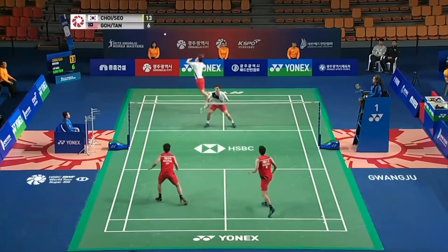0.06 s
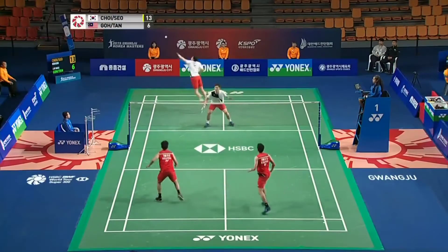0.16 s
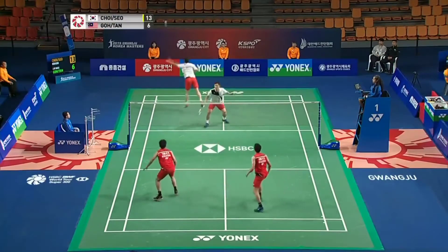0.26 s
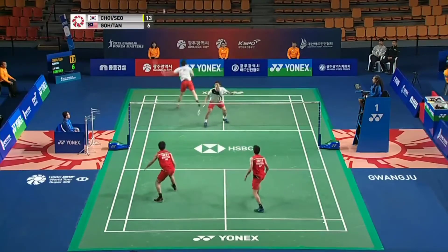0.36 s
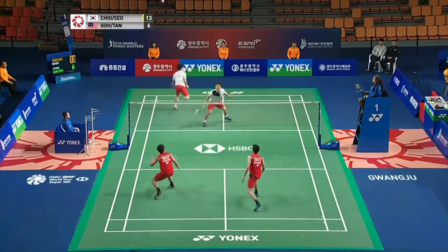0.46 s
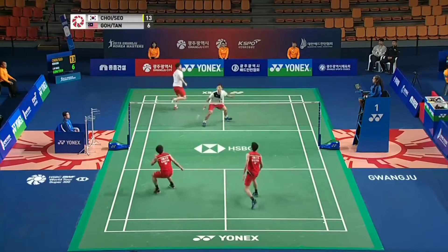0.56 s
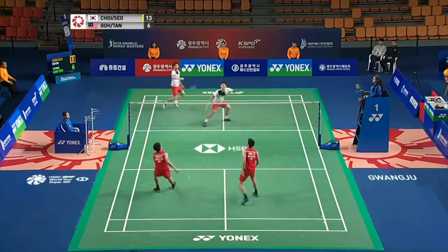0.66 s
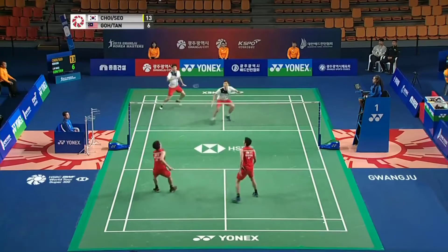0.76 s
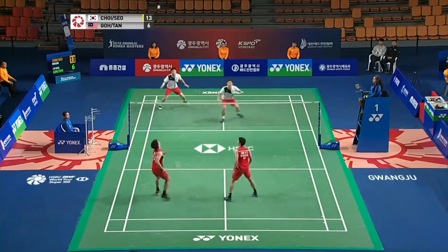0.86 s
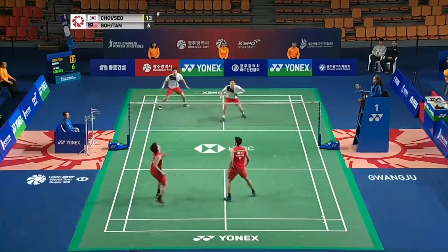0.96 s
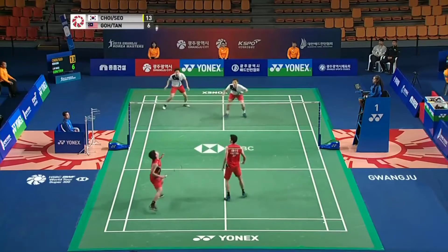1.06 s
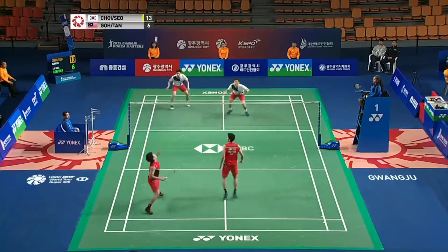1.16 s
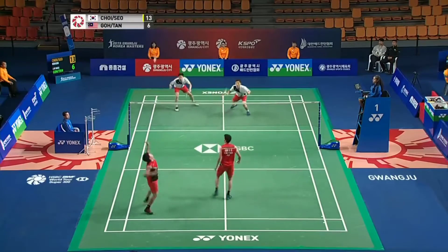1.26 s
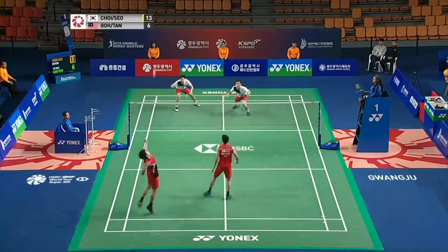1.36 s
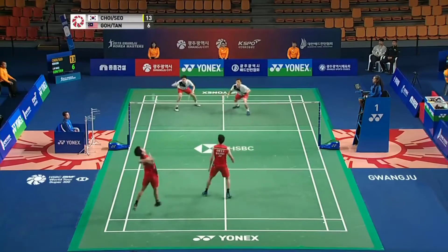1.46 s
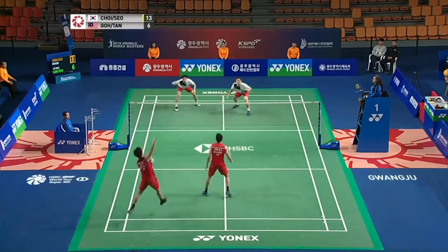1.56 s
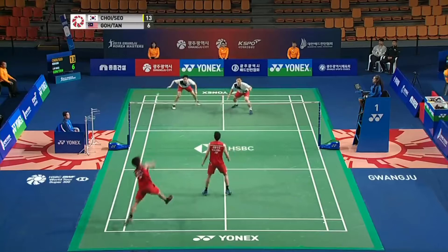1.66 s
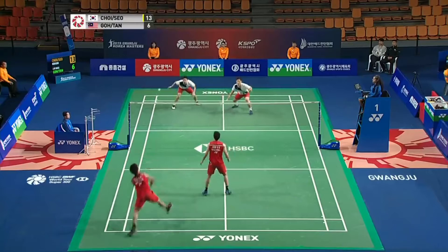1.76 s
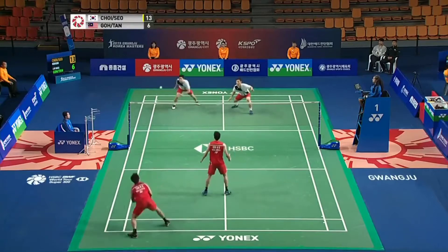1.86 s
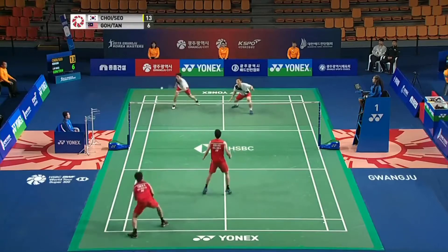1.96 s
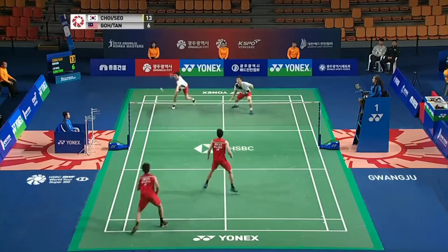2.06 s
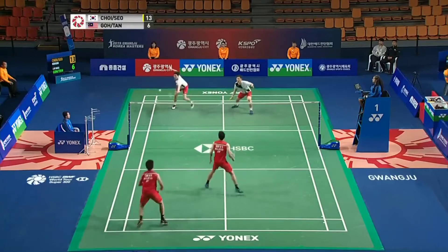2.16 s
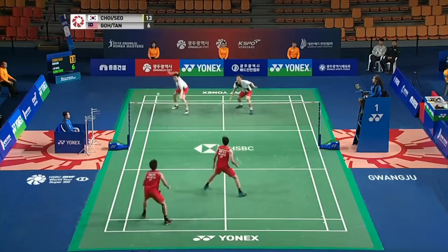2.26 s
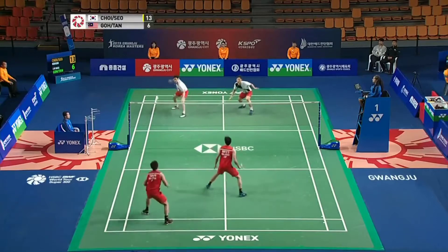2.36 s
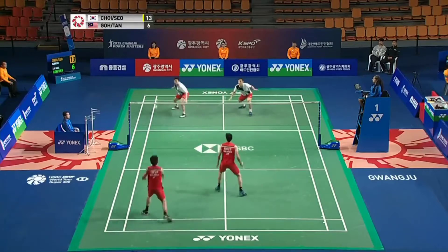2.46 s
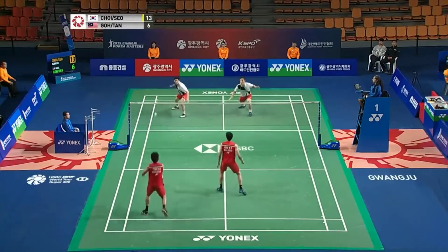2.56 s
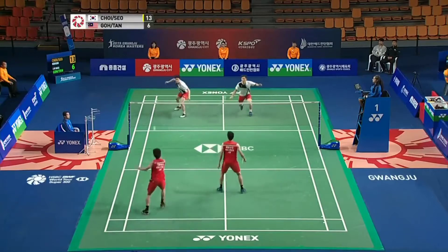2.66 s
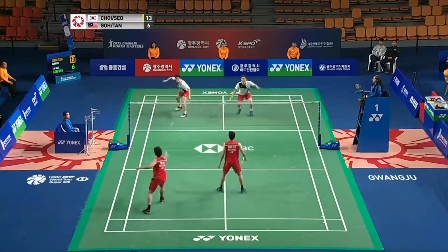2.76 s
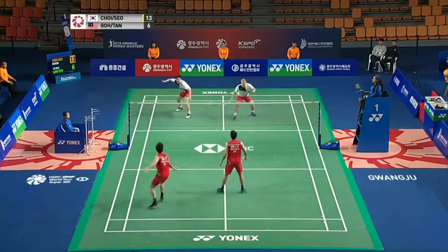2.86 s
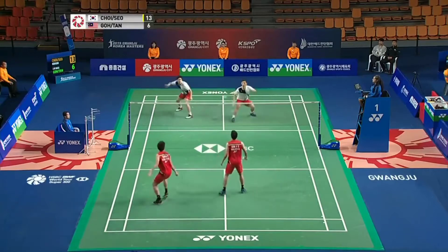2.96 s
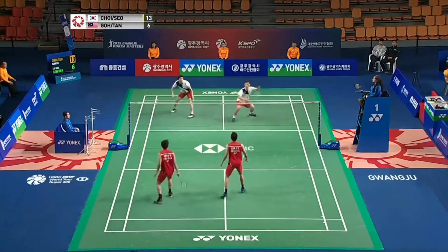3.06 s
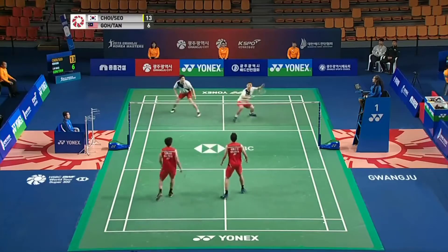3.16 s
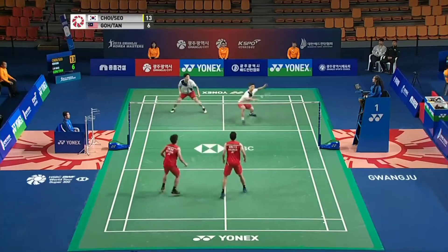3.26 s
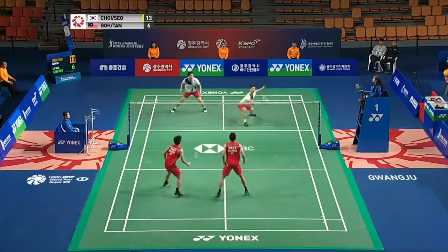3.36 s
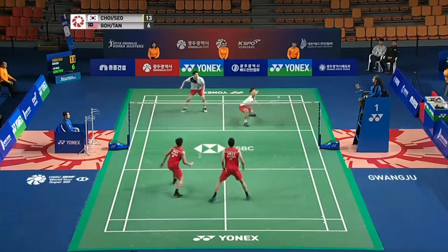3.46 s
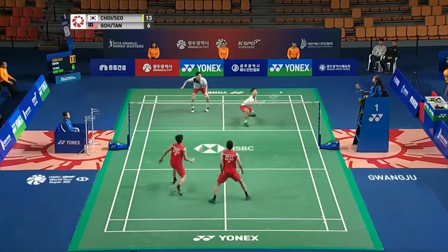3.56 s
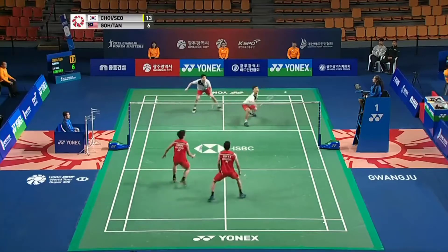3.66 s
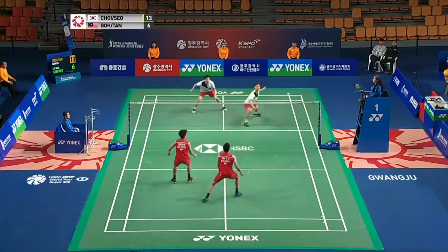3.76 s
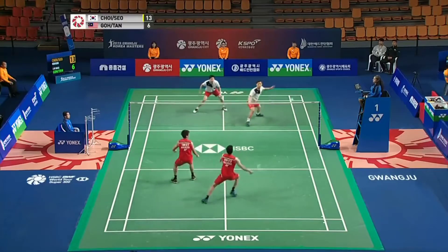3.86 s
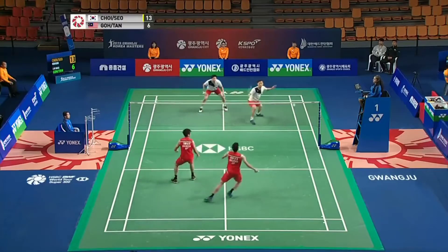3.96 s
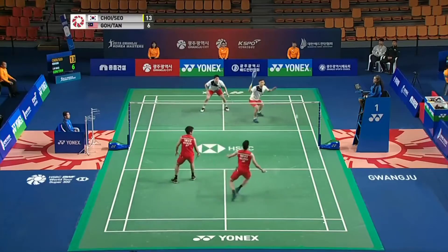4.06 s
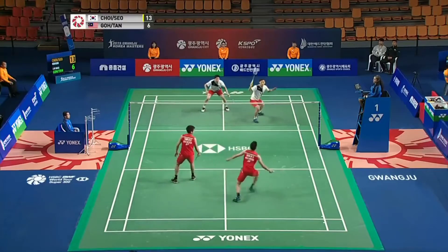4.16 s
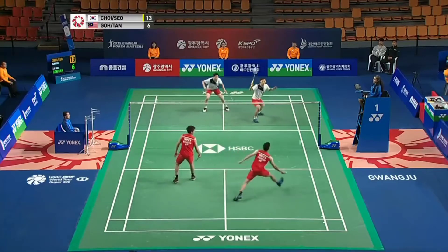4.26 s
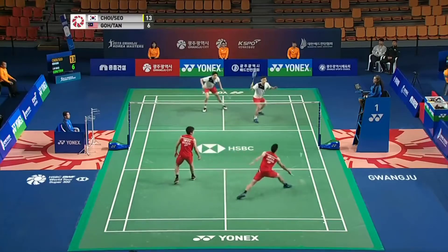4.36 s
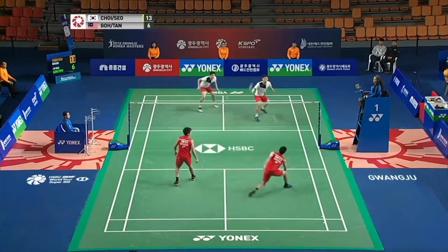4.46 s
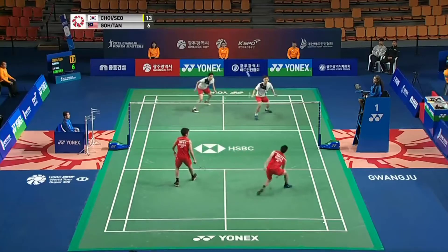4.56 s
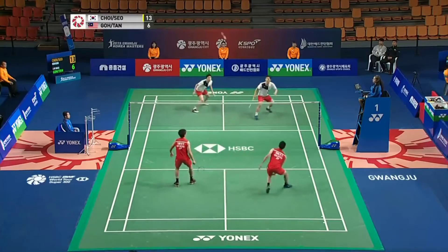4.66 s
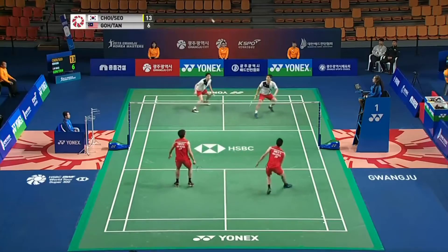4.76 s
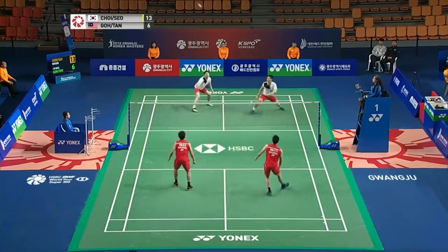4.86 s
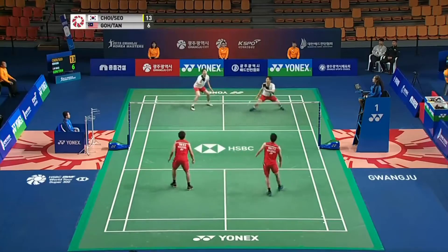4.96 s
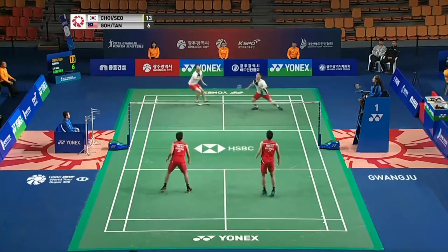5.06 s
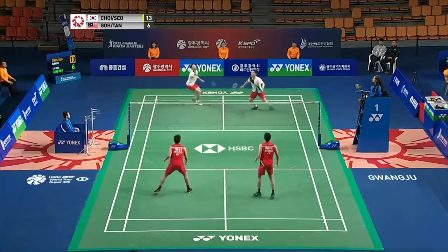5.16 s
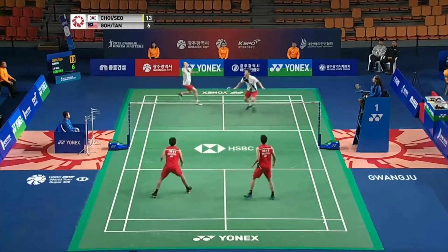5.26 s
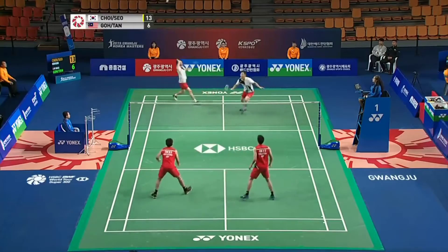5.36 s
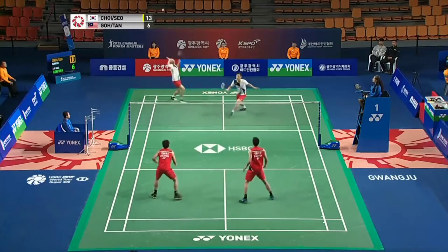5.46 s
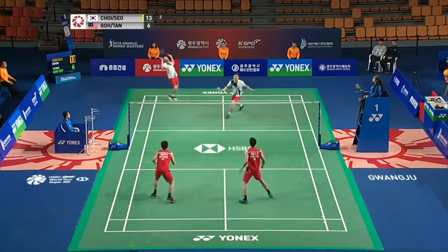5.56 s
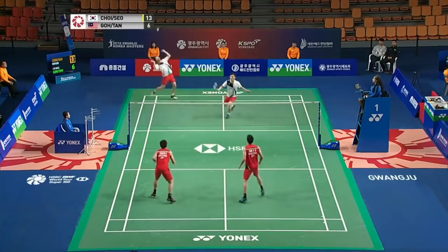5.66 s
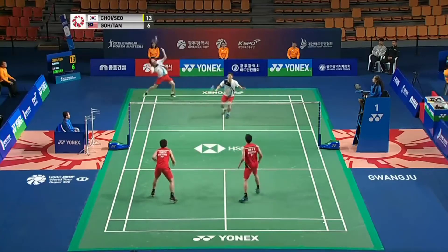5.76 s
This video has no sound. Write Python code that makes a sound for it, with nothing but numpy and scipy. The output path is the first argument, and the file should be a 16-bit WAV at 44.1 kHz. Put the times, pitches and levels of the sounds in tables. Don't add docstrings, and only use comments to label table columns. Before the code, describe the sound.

Rackets smack a shuttlecock at uneven intervals while rubber soles tap, scuff and chirp on a sprung court in a reverberant arena.

```python
import sys
import numpy as np
from scipy import signal
from scipy.fft import rfft, irfft, next_fast_len
from scipy.io import wavfile
from scipy.ndimage import uniform_filter1d

SR = 44100
rng = np.random.default_rng(int(sys.argv[2]) if len(sys.argv) > 2 else 0)


def amplitude_ratio(level_db):
    exponent = np.asarray(level_db, float) / 20
    return 10 ** exponent


def file_out(sig):
    cols = np.atleast_2d(sig).T
    lim = np.clip(cols, -1, 1)
    pcm = np.round(lim * 32767).astype(np.int16)
    wavfile.write(sys.argv[1], SR, pcm)


N = 255817
T = np.arange(N) / SR


def noise(n=N):
    return rng.standard_normal(n)


def colour(x, points):
    hz, db = np.transpose(points)
    size = next_fast_len(len(x))
    log_f = np.log(np.arange(size // 2 + 1) * SR / size + 1)
    gain = amplitude_ratio(np.interp(log_f, np.log(hz), db))
    return irfft(rfft(x, size) * gain, size)[:len(x)]


def band(x, lo_hz, hi_hz):
    sos = signal.butter(2, [lo_hz, min(hi_hz, 0.45 * SR)], "band", fs=SR, output="sos")
    return signal.sosfilt(sos, x)


def unit(x):
    return x / np.sqrt(np.mean(x ** 2))


def add(out, start_s, x):
    i = int(start_s * SR)
    out[i:i + len(x)] += x[:N - i]


def decay(t, t60_s):
    return np.exp(-np.log(1000) * t / t60_s)


def burst(fall_s, lo_hz, hi_hz):
    t = T[:1500]
    push = 0.5 * noise(len(t)) * np.exp(-t / fall_s)
    push[0] = np.sqrt(fall_s * SR) / 2
    x = band(band(push, lo_hz, hi_hz), lo_hz / 4, 1.82 * hi_hz)
    return x / np.abs(x).max()


def flicker(rate_hz):
    hold = int(SR / rate_hz)
    levels = np.repeat(noise(N // hold + 1), hold)
    return unit(uniform_filter1d(levels, hold)[:N])


def swells(table, rise_s, rest_db):
    power = np.full(N, amplitude_ratio(rest_db) ** 2)
    for s, db, t60_s in table:
        swell = amplitude_ratio(db) * (1 - np.exp(-T / rise_s)) * decay(T, t60_s)
        add(power, s, swell ** 2)
    return np.sqrt(power)


# t/s, crack level/dB, bright edge level/dB, crack f/Hz, hall send level/dB
NEAR_BLOWS = [(0.273, -23, -4.5, 2150, 2), (0.2826, -28, -18, 1300, 0), (0.2947, -28, -4, 1340, -3),
              (1.6388, -3.5, -31, 1690, 5), (1.6422, -9.5, -12, 1260, 1.5), (1.6528, -15, -28, 1150, -8),
              (1.6622, -5.5, -21, 1260, -21), (1.6657, -6.5, -13.5, 1340, -16), (2.1058, -27, -6, 760, 1),
              (2.1254, -23, -7.5, 1260, 4.5), (2.7861, -30, -9, 2110, 2), (2.811, -22.5, -12, 1320, 8),
              (4.4957, -21.5, -18, 2170, -2), (4.5017, -18, -13, 1980, -4),
              (4.5161, -12.5, -5.5, 1390, 5.5), (4.542, -21.5, -28, 2370, 5)]
# t/s, crack level/dB, bright edge level/dB, crack f/Hz, hall send level/dB
FAR_BLOWS = [
    (3.2, -37.5, -16, 1120, 34.4),
    (3.217, -20.5, -13, 816, 11.6),
    (3.2325, -22.5, -1.5, 880, 6.7),
    (3.266, -30, -27, 890, 5),
    (3.296, -31, -27, 1340, 28),
    (5.617, -35.5, -27, 1350, 8),
    (5.636, -33, -32, 1280, 8),
    (5.65, -39, -30, 870, 24.7),
]


def rackets(table, width, edge_hz, body_db):
    direct, send = np.zeros(N), np.zeros(N)
    for s, db, edge_db, hz, hall_db in table:
        crack = burst(0.0015, hz / width, hz * width)
        body = amplitude_ratio(body_db + 0.46 * db) * burst(0.0048, 254, 906)
        edge = amplitude_ratio(edge_db) * burst(0.0039, edge_hz, 9200)
        add(direct, s, body + amplitude_ratio(db) * (crack + edge))
        add(send, s, amplitude_ratio(db + hall_db) * band(crack, hz / width, hz * width))
    return np.array([direct, send])


# t/s, f/Hz, level/dB, t60/s
STRING_RINGS = [(0.001, 1296, -55, .3), (.272, 430, -34, 0.025), (0.2937, 378, -21, 0.018),
                (0.273, 1320, -30, .03), (1.6375, 1590, -10, 0.018), (1.6525, 900, -16, 0.015),
                (1.661, 1057, -15, 0.026), (1.664, 392, -24, 0.04), (2.13, 2040, -47, 0.32),
                (2.126, 455, -26, 0.034), (3.216, 2500, -31, 0.034), (3.216, 3250, -33, .03),
                (3.231, 2450, -32, 0.054), (3.231, 3750, -34, .03), (3.478, 1330, -42, 0.054),
                (2.83, 2850, -51, 0.22), (2.855, 1380, -42, 0.13), (.272, 2140, -30.5, 0.064),
                (0.283, 1327, -32.5, 0.17), (.295, 2076, -35, 0.14), (0.295, 3000, -40.5, 0.25),
                (0.295, 1273, -43, 0.12), (1.6412, 4740, -18.5, 0.032), (1.638, 2880, -24, 0.074),
                (1.665, 1380, -16, 0.052), (1.666, 3000, -17.5, 0.03), (1.752, 5860, -59, 0.065),
                (2.127, 1287, -33, 0.26), (3.234, 830, -32, 0.097), (2.17, 5320, -54, 0.087),
                (2.787, 2057, -36.5, 0.13), (2.79, 1275, -37, 0.19), (2.811, 1344, -40, 0.29),
                (2.83, 3460, -48, 0.26), (3.527, 3660, -50.5, 0.16), (4.356, 4190, -44, 0.15),
                (4.371, 1520, -30, 0.029), (4.497, 2670, -21, 0.018), (4.516, 1252, -34.5, 0.18),
                (4.515, 2560, -26.5, 0.061), (4.611, 2890, -44, 0.066)]


def strings():
    out, t = np.zeros(N), T[:15000]
    chances = rng.random((len(STRING_RINGS), 2))
    for (s, hz, db, t60_s), (split, turn) in zip(STRING_RINGS, chances):
        partner_hz = hz + 25 + 40 * split
        pair = np.sin(2 * np.pi * hz * t) + 0.53 * np.sin(2 * np.pi * (partner_hz * t + turn))
        add(out, s, amplitude_ratio(db) * pair * decay(t, t60_s) * (1 - np.exp(-t / 0.0013)))
    return out


# t/s, length/s, start f/Hz, end f/Hz, level/dB
RACKET_SWISHES = [
    (0.23, 0.038, 323, 462, -39.5),
    (1.611, 0.029, 404, 1430, -27.5),
    (3.183, 0.021, 600, 1110, -38),
    (5.6, 0.0094, 760, 1100, -41),
    (2.77, 0.011, 353, 555, -47),
    (4.317, 0.038, 570, 877, -43.5),
    (4.442, 0.038, 480, 875, -55),
]


def swishes():
    out = np.zeros(N)
    for s, length_s, from_hz, to_hz, db in RACKET_SWISHES:
        u = T[:int(length_s * SR)] / length_s
        wobble = uniform_filter1d(noise((2, 4000)), size=70)[:, :len(u)]
        phase = 2 * np.pi * np.cumsum(from_hz + (to_hz - from_hz) * u) / SR
        whoosh = (1 + 4 * wobble[0]) * np.sin(phase) + 4 * wobble[1] * np.cos(phase)
        add(out, s, amplitude_ratio(db) * u ** 1.17 * np.cos(1.3 * u ** 3) * whoosh)
    return out


# t/s, tick level/dB
HEEL_LANDINGS = [(0.1077, -59), (0.4337, -27), (0.4552, -27.5), (0.4635, -33.5), (0.4833, -31.5),
                 (0.497, -30), (0.511, -26), (0.9756, -44), (0.9934, -39.5), (1.309, -39.5), (1.3407, -45),
                 (2.94, -37), (2.37, -47), (4.366, -40), (4.943, -39), (5.285, -44), (5.298, -37.5),
                 (1.3947, -46), (1.8905, -26), (1.9071, -25), (2.2304, -46), (2.5123, -39), (2.9555, -44),
                 (2.9609, -30.5), (3.0005, -34.5), (3.809, -40.5), (3.8278, -47), (4.3378, -42),
                 (4.3983, -36.5), (4.5986, -38.5), (4.9123, -36.5), (4.9314, -37.5), (5.429, -41),
                 (5.4516, -43.5)]
# t/s, tick level/dB
TOE_PUSHES = [(0.61, -32), (0.59, -45), (1.784, -49), (1.923, -30.5), (1.936, -33), (2.9995, -32),
              (3.2006, -27.5), (4.8552, -38), (4.9131, -42), (4.932, -47), (4.95, -48), (5.4279, -49),
              (5.4424, -37.5), (5.716, -44), (5.7472, -59), (0.604, -31), (0.621, -28), (0.7412, -35),
              (0.8414, -35), (0.85, -39), (0.8718, -34.5), (1.7518, -30), (1.8821, -22), (1.9155, -25.5),
              (1.9494, -39), (2.2513, -34), (2.2876, -43), (2.3203, -35), (2.932, -34.5), (3.0175, -27),
              (3.1578, -36), (4.3555, -27), (4.372, -25), (4.579, -30), (4.67, -39)]
# t/s, tick level/dB
SOLE_SLAPS = [(0.49, -35), (0.5121, -32), (0.53, -38), (0.7601, -47), (0.796, -39), (1.3765, -43.5),
              (2.3395, -40), (2.9541, -37), (3.005, -37), (3.168, -41), (4.428, -39.5), (5.2653, -51),
              (5.2775, -45), (5.67, -39), (0.556, -32.5), (0.7732, -35.5), (0.8092, -39), (1.1852, -40),
              (1.2061, -38.5), (1.601, -40.5), (1.7918, -30), (1.8004, -46), (1.811, -32), (2.7401, -49),
              (2.9875, -33), (3.0532, -33.5), (3.0937, -44), (3.119, -40), (3.3845, -52), (3.4194, -35.5),
              (3.4732, -34.5), (3.5292, -53), (4.2956, -44), (4.6102, -30), (4.6282, -31), (4.6594, -37),
              (4.8489, -38.5), (5.2825, -48), (5.297, -55), (5.512, -43)]


def steps(table, knock_db, edge_db):
    out = np.zeros(N)
    for s, db in table:
        tick = burst(0.0012, 830, 3740)
        knock = amplitude_ratio(knock_db) * burst(0.002, 177, 937)
        edge = amplitude_ratio(edge_db) * burst(0.00078, 2950, 6860)
        add(out, s, amplitude_ratio(db) * (tick + knock + edge))
    return out


# t/s, level/dB, f/Hz, length/s, glide/ratio
CLEAN_SQUEAKS = [
    (1.74, -40.5, 1990, 0.038, 0.93),
    (3.889, -16.5, 2285, 0.013, 1.027),
]
# t/s, level/dB, f/Hz, length/s, glide/ratio
LUNGE_CHIRPS = [
    (3.873, -28, 2190, 0.0081, 1.07),
    (3.8805, -35, 2220, 0.0098, 1),
    (3.902, -44.5, 2330, 0.011, 0.81),
    (3.911, -40, 2340, 0.012, 0.85),
    (3.92, -41, 2300, 0.011, 1.02),
    (3.936, -30.5, 2340, 0.01, 0.98),
    (3.949, -39.5, 2340, 0.011, 0.93),
]
# t/s,
# level/dB, f/Hz, length/s, glide/ratio
GRITTY_RASPS = [(.052, -40.5, 2870, 0.023, 0.73), (.068, -47, 2770, .02, 1.2),
                (.076, -37, 2510, 0.016, 0.93), (.652, -39, 2640, 0.018, 1.1),
                (.668, -31.5, 2706, 0.021, 1.01), (1.218, -51, 2350, 0.014, 1.1),
                (1.231, -38.5, 2360, 0.012, 1.03), (1.247, -38, 2370, 0.024, 1.03),
                (1.277, -47, 3050, 0.011, 1.2), (1.285, -50, 2350, .012, 1.01),
                (2.4, -42.5, 2750, 0.019, 1.1), (2.385, -35.5, 2590, 0.0275, 0.79),
                (2.411, -35, 2515, 0.024, 0.81), (2.43, -38, 2160, .02, 0.72),
                (2.445, -45, 2360, 0.019, 0.98), (3.882, -40.5, 3200, 0.0078, 1.1),
                (3.862, -45, 2670, 0.0084, 1.06), (3.93, -40, 2550, 0.0073, 0.98),
                (3.1, -50.5, 2250, .035, .97), (3.145, -49, 2150, 0.043, 1.1),
                (4.86, -45, 1790, 0.017, 1.01), (4.88, -45, 1800, 0.017, 0.96),
                (5.168, -51, 2510, 0.014, .98), (5.185, -54, 2330, 0.013, 1.1),
                (5.614, -36.5, 1160, .007, 1.5), (5.62, -35.5, 1470, 0.0064, 1.2),
                (5.633, -31, 1000, 0.0074, 1.73)]


def squeaks(table, rough, over_db):
    out = np.zeros(N)
    for s, db, hz, length_s, glide in table:
        u = T[:int(length_s * SR)] / length_s
        chance = uniform_filter1d(uniform_filter1d(noise((2, 4000)), size=40), size=30)
        shake, grip = chance[:, :len(u)]
        phase = 2 * np.pi * np.cumsum(hz * (1 + (glide - 1) * u + 0.51 * rough * shake)) / SR
        arch = np.sin(np.pi * u)
        overtones = amplitude_ratio(over_db) * np.sin(2 * phase) + amplitude_ratio(over_db - 11) * np.sin(3 * phase)
        tone = np.sin(phase) + arch * overtones
        add(out, s, amplitude_ratio(db) * arch ** 1.6 * (1 + 7 * rough * grip) * tone)
    return out


# t/s, length/s, level/dB, high edge f/Hz
SOLE_DRAGS = [(0.038, 0.076, -53.5, 6000), (0.107, 0.033, -54.5, 6000), (0.278, 0.093, -47, 12000),
              (0.45, 0.091, -54, 9000), (0.608, 0.15, -52, 8960), (0.768, 0.11, -64, 12100),
              (0.869, 0.078, -48.5, 10000), (0.988, 0.086, -56.5, 8100), (1.241, 0.071, -44.5, 8000),
              (1.394, 0.15, -67.5, 8040), (1.666, 0.053, -40.5, 15000), (1.777, 0.063, -50.5, 12100),
              (1.895, 0.12, -59, 6000), (2.099, 0.073, -43.5, 15000), (2.318, 0.21, -55, 8900),
              (2.478, 0.13, -55.5, 14000), (2.783, 0.091, -41, 12000), (2.93, 0.12, -56, 10100),
              (3.088, 0.11, -55.5, 10000), (3.212, 0.048, -34.5, 12000), (3.355, 0.089, -49, 11800),
              (3.457, 0.31, -52.5, 11000), (3.862, 0.064, -47, 9000), (3.948, 0.094, -48.5, 12000),
              (4.061, 0.11, -52.5, 11000), (4.353, 0.06, -45, 10100), (4.523, 0.18, -53, 10000),
              (4.853, 0.049, -54.5, 10000), (4.926, 0.45, -59.5, 11000), (5.436, 0.032, -60, 10000),
              (0.708, .022, -53, 9000), (0.8, .024, -57, 10100), (0.926, .03, -52, 9000),
              (3.115, 0.016, -50.5, 9900), (1.226, .02, -56, 7000), (1.416, 0.014, -64, 7960),
              (0, 0.052, -61, 7000)]
# t/s, length/s, level/dB, high edge f/Hz, low edge f/Hz
SKIDS = [
    (5.511, 0.048, -47.5, 15000, 2300),
    (5.545, 0.048, -49.5, 6000, 2900),
    (5.578, 0.038, -46, 7900, 3100),
    (5.62, 0.098, -42.5, 3800, 2940),
    (5.56, 0.1, -50.5, 13000, 4000),
    (2.5, 0.068, -42, 13000, 8600),
]
# f/Hz, level/dB per Hz
GRIT_COLOUR = [(1180, -30), (2000, -2), (2910, -5.5), (3200, -8.5), (5240, -13), (10900, -34.5),
               (13000, -36)]


def drags(table, stop):
    out = np.zeros(N)
    grains = np.minimum(rng.exponential(size=N), 4.5)
    rubbing = noise() * amplitude_ratio(3.3 * grains + 2 * flicker(60))
    grit = unit(colour(rubbing, [(900, -3)] + GRIT_COLOUR[1:]))
    for s, length_s, db, hi_hz, lo_hz in table:
        u = T[:int(1.5 * length_s * SR)] / length_s
        stroke = band(grit[int(s * SR):][:len(u)], lo_hz, hi_hz)
        stroke = band(stroke, 0.93 * lo_hz, 1.6 * hi_hz)
        speed = np.minimum(u / 0.078, 1) * np.exp(-1.5 * u ** stop)
        add(out, s, amplitude_ratio(db + 3.5) * speed[:len(stroke)] * stroke)
    return out


# f/Hz, width/Hz, level/dB
FLOOR_MODES = [(57.2, 12, -0.5), (83.8, 12.3, -1.5), (110.7, 17.4, -1), (150.3, 49, -2), (230, 115, -7.5)]
# t/s, boom level/dB, t60/s
BODY_THUDS = [(0.045, -57, 0.52), (0.276, -57, 0.96), (0.497, -29.5, 0.51), (0.747, -45.5, 0.98),
              (1.238, -51, 0.88), (1.652, -65, 0.45), (1.776, -56, 0.7), (1.894, -37.5, 0.45),
              (2.114, -51, 0.47), (2.251, -46, 0.97), (2.43, -39, 0.43), (2.781, -47.5, 1), (3.017, -41, 1),
              (3.415, -56, 1), (3.657, -62, 0.58), (3.898, -37.5, 0.48), (4.181, -48, 0.22),
              (4.397, -38, 1), (4.836, -51, 0.7), (4.926, -42.5, 0.67), (5.232, -49.5, 0.93),
              (5.29, -52, 0.25), (3.8, -50, 0.48), (4.11, -53, 0.24), (.4, -48, 0.37), (5.446, -43, 0.62)]


def floor_boom():
    boom = np.zeros(N)
    for hz, width_hz, db in FLOOR_MODES:
        boom += amplitude_ratio(db) * unit(band(noise(), hz - width_hz / 2, hz + width_hz / 2))
    boom = boom / np.sqrt(uniform_filter1d(boom ** 2, size=2600) + 0.046 * np.mean(boom ** 2))
    return amplitude_ratio(-2.5) * swells(BODY_THUDS, rise_s=0.0052, rest_db=-63) * unit(boom)


# t/s, level/dB, t60/s
WASH_SWELLS = [(0.03, -51, 2.6), (0.275, -38.5, 0.7), (0.43, -48, 2.5), (0.61, -45, 1.76),
               (0.86, -46, 0.91), (1.19, -52, 1.5), (1.68, -39.5, 0.92), (1.885, -43, 1.02),
               (2.11, -38.5, 0.99), (2.33, -45.5, 1.78), (2.8, -42.5, 0.75), (2.95, -51.5, 4.4),
               (3.22, -36.5, 0.96), (3.38, -47.5, 3.5), (3.58, -48.5, 0.55), (3.82, -44, 0.94),
               (3.9, -68.5, 0.49), (4.35, -41.5, 0.69), (4.4, -41, 0.66), (4.5, -36.5, 0.56),
               (4.6, -47, 1.67), (4.89, -47, 1.7), (5.27, -51.5, 0.69), (5.43, -52, 5.3),
               (5.645, -46, 1.3)]


def blurred_wash():
    wash = unit(band(noise() * amplitude_ratio(2.07 * flicker(50)), 223, 1687))
    return swells(WASH_SWELLS, rise_s=0.015, rest_db=-66.5) * wash


# f/Hz, t60/s, level/dB
HALL_TAIL = [(144, 1.54, 10), (365, 3, 8), (773, 1.18, 5), (1500, 3.4, -2.5), (3000, 4.1, 3),
             (6000, 0.64, 7), (11000, 0.37, -4)]


def hall(send, near):
    t = T[:int(2.2 * SR)]
    tail = np.zeros(len(t))
    for hz, t60_s, db in HALL_TAIL:
        tail += amplitude_ratio(db) * unit(band(noise(len(t)), hz / 1.31, hz * 1.45)) * decay(t, t60_s)
    tail = tail * (1 - np.exp(-t / 0.0049))
    close = band(noise(8000), 370, 6300) * decay(t[:8000], 0.079)
    late = signal.fftconvolve(send, tail / np.linalg.norm(tail))[:N]
    early = signal.fftconvolve(near, close / np.linalg.norm(close))[:N]
    return amplitude_ratio(-18.5) * late + amplitude_ratio(-10) * early


# f/Hz, level/dB per Hz
AIR_COLOUR = [(26, -14), (45, 0), (163, -17), (254, -3.5), (661, -4.5), (743, -11), (1610, -40),
              (1770, -22), (2340, -10.5), (2820, -27), (12000, -42), (15600, -88), (22000, -120)]


def ventilation():
    return amplitude_ratio(-63.5 + 4.3 * flicker(6)) * unit(colour(noise(), AIR_COLOUR))


def treble_spread(mix):
    scrambled = band(mix, 4000, 15000) * np.sign(flicker(400))
    top = band(band(scrambled, 8500, 14500), 8000, 14500)
    below = (flicker(25) > 1.1) * band(scrambled, 4500, 9000)
    return amplitude_ratio(-12) * top + amplitude_ratio(-7) * below


def scene():
    blows, send = (rackets(NEAR_BLOWS, width=1.79, edge_hz=2600, body_db=-15.5)
                   + rackets(FAR_BLOWS, width=1.243, edge_hz=2100, body_db=-22))
    ticks = (steps(HEEL_LANDINGS, knock_db=3, edge_db=-14)
             + steps(TOE_PUSHES, knock_db=-8, edge_db=-17)
             + steps(SOLE_SLAPS, knock_db=-4.5, edge_db=-4))
    squeal = (squeaks(CLEAN_SQUEAKS, rough=0.18, over_db=-16.5)
              + squeaks(LUNGE_CHIRPS, rough=0.36, over_db=-6.5)
              + squeaks(GRITTY_RASPS, rough=0.55, over_db=-30))
    slides = drags([row + (2300,) for row in SOLE_DRAGS], stop=3.3)
    skids = drags(SKIDS, stop=6.4)
    hall_send = send + amplitude_ratio(-1.5) * (ticks + slides) + amplitude_ratio(-8.5) * squeal
    room = hall(hall_send, blows + ticks + squeal / 6)
    mix = blows + strings() + swishes() + ticks + squeal + slides + skids
    mix = mix + floor_boom() + blurred_wash() + room + ventilation()
    side = treble_spread(mix)
    return np.array([mix + side, mix - side])


def starve(x):
    f, _, z = signal.stft(x, SR, nperseg=2048)
    power = np.mean(np.abs(z[:, :-1]) ** 2, axis=0)
    block_power = power.reshape(32, 32, -1).mean(axis=1)
    strong = np.repeat(block_power, 32, axis=0) > amplitude_ratio(-114) ** 2
    keep = strong | (f[:-1, None] < 10400)
    z[:, :-1] *= np.minimum.accumulate(keep, axis=0)
    return signal.istft(z, SR, nperseg=2048)[1][:, :N]


def band_limit(x):
    return signal.sosfilt(signal.butter(12, 15400, fs=SR, output="sos"), x)


def record(dry):
    trimmed = signal.sosfilt(signal.butter(4, 50, "high", fs=SR, output="sos"), dry)
    trimmed = signal.sosfilt(signal.butter(2, 9000, fs=SR, output="sos"), trimmed)
    haze = amplitude_ratio(-97 + 3 * flicker(6)) * band(band(noise(), 12500, 15300), 12500, 15300)
    return band_limit(starve(trimmed) + haze)


dry = scene()
out = record(dry)
file_out(out)
```